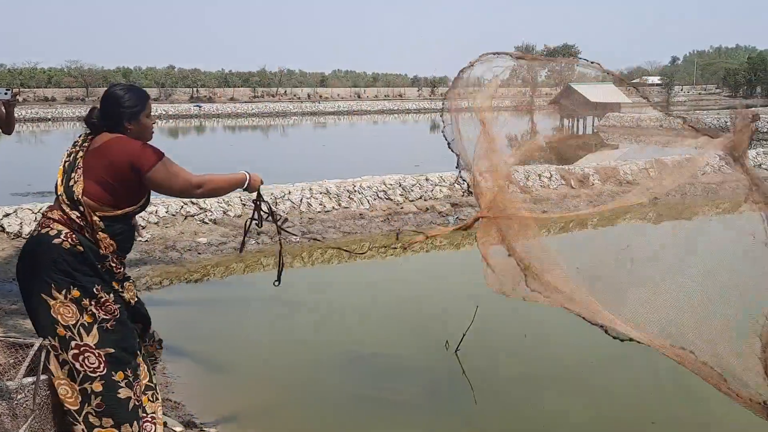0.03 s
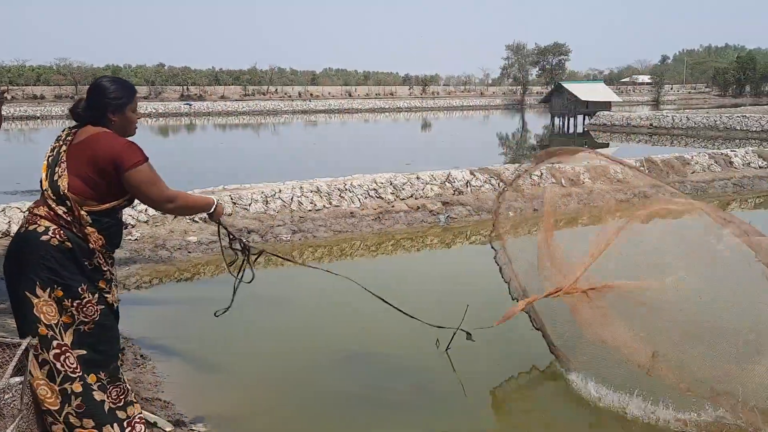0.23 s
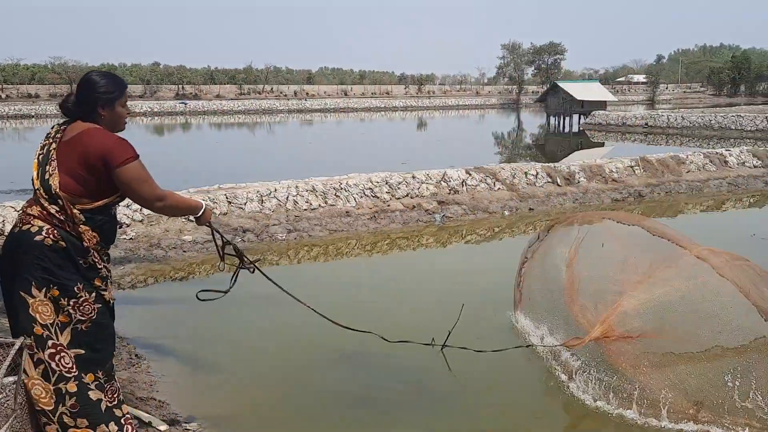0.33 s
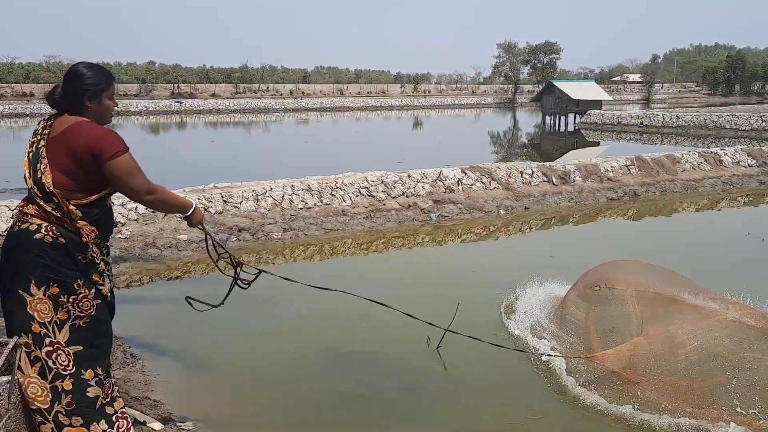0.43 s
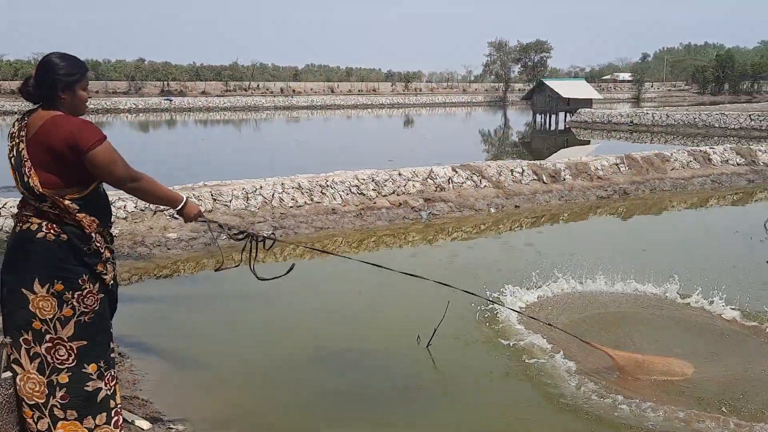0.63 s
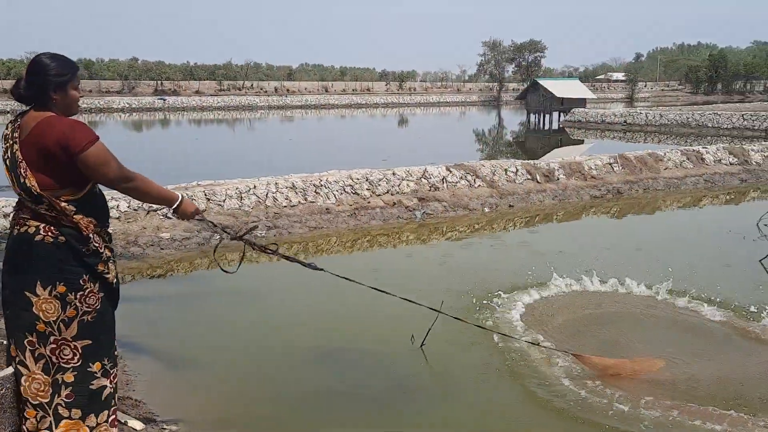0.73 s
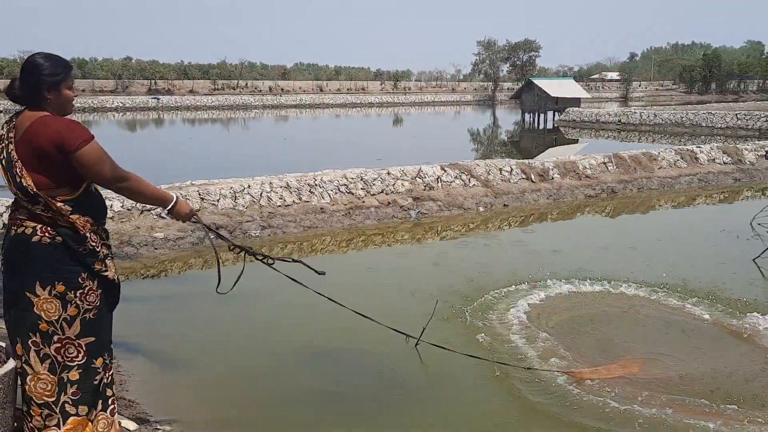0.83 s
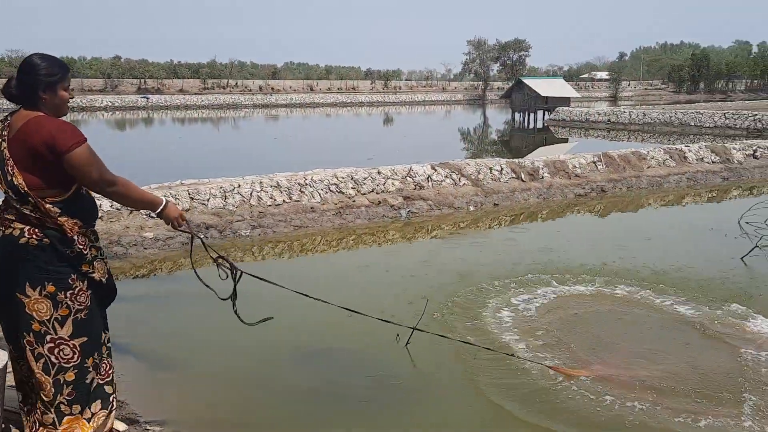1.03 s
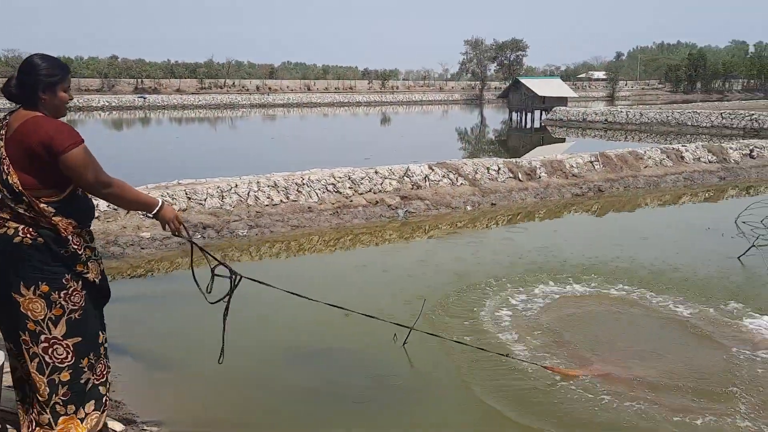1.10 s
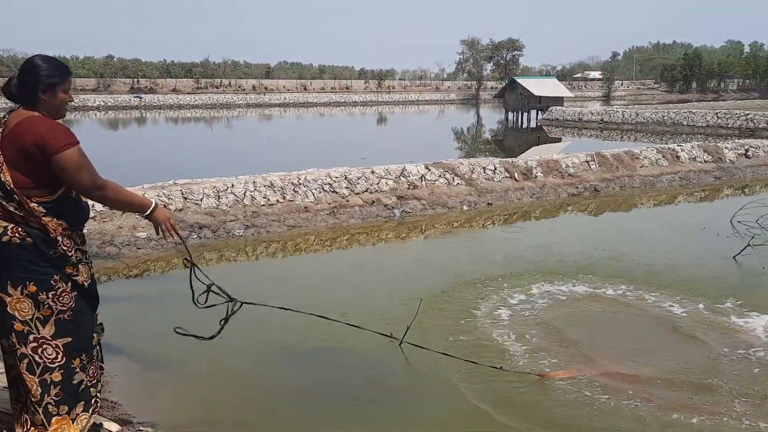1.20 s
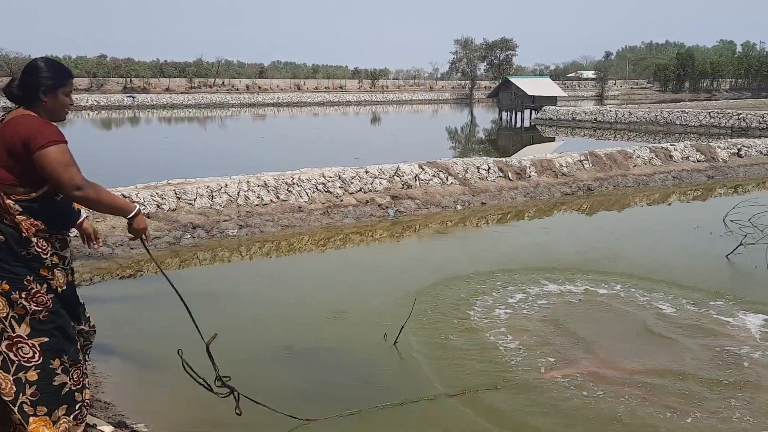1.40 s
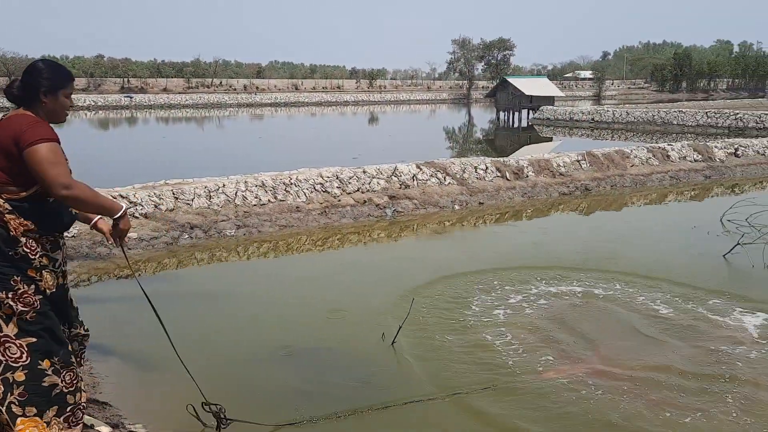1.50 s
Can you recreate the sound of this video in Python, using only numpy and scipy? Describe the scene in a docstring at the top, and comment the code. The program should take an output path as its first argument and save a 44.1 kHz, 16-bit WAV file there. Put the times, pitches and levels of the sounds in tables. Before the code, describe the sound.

A net splashes into a pond outdoors, heard close in stereo without echo. From 0 to 0.23 s, a thin hiss drops away under faint flutter, bangle jingles and dry clicks. At 0.24 s spray bursts out; heavy slaps at 0.31, 0.42 and 0.58 s mix with sharp drops and gulping bubbles. Foam thins to gurgles by 1.2 s; faint hiss remains, and the line rustles softly near 1.47 s.

```python
"""A thin, bright hiss soon drops away while a net flutters open, bangles jingle and the net's weights click.
Its weighted rim then tears into a pond: spray, heavy slaps and bubbles that churn, gulp and thin out.
A faint background hiss lies under the end, where the hand line rustles as it is let go.
Coloured noise makes the hiss, slaps, drops, rustle and faint rumble; sines that die away make the single
bubbles and bangles; crowds of short gliding sines make the flutter and, over noise, the spray and foam."""
import sys
import numpy as np
from scipy.fft import rfft, irfft, next_fast_len
from scipy.io import wavfile

SR = 44100
rng = np.random.default_rng(int(sys.argv[2]) if len(sys.argv) > 2 else 0)


def materialize(psi):
    """Save the field psi as 16-bit PCM at rate SR to the path in sys.argv[1].

    A 1-D psi becomes a single channel; in a 2-D psi each row is a channel.
    """
    bounded = np.clip(np.atleast_2d(psi).T, -1, 1)
    quanta = np.round(bounded * 32767).astype(np.int16)
    wavfile.write(sys.argv[1], SR, quanta)


N = 68355  # length in samples

# In every table, fade_s is the time to fade by 60 dB, and side_db is left minus right.
# How loud each part of the splash is over time: start_s, level_db
# Fine spray and foam, then the finest spray, thrown only while the rim cuts the surface
SPRAY_LEVEL = [(.232, -68), (.243, -36.5), (.256, -32), (.285, -38), (.33, -33.5), (.46, -31.5),
               (.523, -30.5), (.56, -39), (.66, -41.5), (.775, -42.5), (.805, -40), (.87, -45), (1.0, -52),
               (1.15, -60), (1.4, -76)]
MIST_LEVEL = [(.233, -55.5), (.244, -30.5), (.26, -32.5), (.28, -43.5), (.335, -36.5), (.47, -43),
              (.517, -27.5), (.54, -49.5), (.6, -90.5)]
# Small bubbles churning under the rim, then big ones from the air that the net drags under
CHURN_LEVEL = [(.237, -63), (.257, -40), (.305, -34), (.325, -33), (.365, -34), (.43, -28.5), (.47, -31.5),
               (.535, -27), (.62, -36.5), (.7, -38.5), (.88, -41), (1.04, -49.5), (1.14, -54.5),
               (1.23, -65), (1.33, -82.5)]
GULP_LEVEL = [(.245, -83), (.3, -40), (.325, -39.5), (.362, -39), (.43, -30.5), (.5, -32.5), (.575, -32),
              (.615, -47), (.75, -48), (.87, -44.5), (.97, -51), (1.06, -57.5), (1.2, -84.5)]
# Water shoved aside by the sinking rim
SURGE_LEVEL = [(.3, -76), (.385, -53), (.42, -40), (.49, -56.5), (.56, -48.5), (.62, -61), (.82, -57),
               (.97, -85)]
# Heavy slaps of the rim: start_s, level_db, fade_s, side_db
SLAPS = [(.311, -23.5, 0.12, 7), (0.423, -25.5, 0.11, 1), (0.576, -24.5, 0.078, 2.5),
         (0.79, -30.5, 0.025, -3)]
# Single loud bubbles: start_s, pitch_hz, level_db, side_db
BUBBLES = [(.310, 554, -18.5, -5), (.311, 923, -17.5, -1), (.313, 1333, -26, -2), (.424, 951, -20, 5),
           (0.432, 524, -16.5, -0.5), (.470, 437, -20, 2), (.490, 567, -19.5, -6),
           (.574, 1880, -20.5, -11.5), (.578, 754, -19.5, 9), (.648, 492, -33.5, -1),
           (.670, 333, -36.5, 4.5), (0.727, 1225, -25.5, 12), (0.787, 1626, -28, -6),
           (.810, 872, -33.5, 16), (.856, 506, -27, 0), (0.874, 541, -34, -1), (0.889, 2095, -30, -1),
           (.932, 493, -37.5, 3), (1.008, 554, -37.5, -1), (1.044, 1680, -28.5, -2),
           (1.054, 501, -44.5, -16), (1.125, 2510, -44.5, -4), (1.194, 1660, -48, -10),
           (1.239, 1884, -43, -9.5), (1.252, 2670, -45, 2)]
# Sharp cracks of near drops: start_s, level_db
DROPS = [(0.338, -29), (.377, -23), (0.486, -28), (0.511, -18), (0.605, -28), (0.688, -39), (.790, -28.5),
         (.811, -34.5), (.922, -33.5)]
# Bangle contacts: start_s, level_db, pitch_hz that rings hardest
JINGLES = [(.059, -52.5, 9200), (0.071, -51, 15000), (0.081, -47, 12200), (.113, -52, 12310),
           (.170, -54, 9570), (0.185, -51.5, 10700), (.203, -48, 8333)]
# The modes (natural tones) of the bangles: pitch_hz, gain_db
BANGLE_MODES = [(9400, 3.5), (10920, 6), (11400, 0), (13880, 5)]
# Flutter of the net's folds as they open: start_s, level_db
MESH_LEVEL = [(0, -61.5), (.045, -57.5), (.1, -66), (.24, -84)]
# Dry clicks of the net's weights in flight: start_s, level_db
CLICKS = [(.155, -39.5), (0.22, -48.5)]
# The hand line slips through the fingers: start_s, level_db, fade_s
RUSTLES = [(1.466, -38.5, 0.031), (1.476, -44, 0.053)]
# Thin, bright background hiss at the start, which soon drops away: start_s, level_db
OPENING_HISS_LEVEL = [(0, -57), (.05, -56.5), (.08, -58), (.105, -76), (.2, -77)]
# Low rumble near the microphone: start_s, level_db
RUMBLE_LEVEL = [(0, -76.5), (.085, -63), (.175, -65), (.215, -72), (.6, -69.5), (1.37, -73), (1.46, -66.5),
                (1.55, -75.5)]

# Colours, the balance of low and high pitches in each sound: pitch_hz, gain_db
SPRAY_COLOUR = [(1500, -18.5), (3000, -0.5), (3700, 2.5), (6200, 5), (7800, -0.5), (9200, -8), (11000, -4),
                (13500, -4), (16000, -21.5)]
MIST_COLOUR = [(4000, -18.5), (7500, -1), (10000, -7.5), (13500, -2.5), (16000, -4.5)]
CHURN_COLOUR = [(550, -18), (900, 0), (1300, -0.5), (1900, -0.5), (2500, -0.5), (3100, -6), (4500, -14.5)]
TRICKLE_COLOUR = [(750, -8), (1150, 0), (2400, 1), (3400, -10)]
GULP_COLOUR = [(60, -41.5), (210, -47), (320, -9), (480, -4), (600, -1.5), (700, -7), (850, -3.5),
               (1300, -15.5)]
SURGE_COLOUR = [(30, -34.5), (100, -14), (200, -1.5), (290, 8), (500, -21)]
SLAP_COLOUR = [(150, -49), (280, -29.5), (470, -4.5), (950, -6.5), (1400, -11.5), (2400, -13), (9000, -42)]
MESH_COLOUR = [(600, 5.5), (950, 2), (1600, 3), (2600, -8)]
RUSTLE_COLOUR = [(1200, -27.5), (2600, -14.5), (5500, 7), (9000, -3), (12500, -1), (16000, -7)]
OPENING_HISS_COLOUR = [(1000, -22.5), (2300, -2.5), (3400, -5.5), (6000, -0.5), (9000, -13.5), (12000, -3),
                       (16000, -13)]
BACKGROUND_COLOUR = [(500, -32), (1400, -23.5), (2400, -3.5), (3400, -8.5), (5600, 0.5), (9000, -6.5),
                     (12500, -3.5), (16000, -8.5)]
RUMBLE_COLOUR = [(20, -20), (80, 5), (350, -3.5), (600, -18.5), (12000, -28)]
# How alike left and right are: pitch_hz, likeness (0 to 1, no unit)
LIKENESS = [(60, 0.69), (250, 0.87), (520, 0.97), (1000, 0)]
# How much louder the left port is than the right: pitch_hz, side_db
PORTS = [(60, 2.5), (250, 1), (480, -2), (760, 5.5), (1200, 0.5), (1800, 1), (3200, 2.5), (5800, 1),
         (9000, 3.5), (10300, 9), (12500, 13.5), (16000, 2.5)]

THIN_START_S, THIN_S = 0.56, 0.55  # when the churn starts to thin, and how long that takes
SLAP_ATTACK_S, DROP_FADE_S, CLICK_FADE_S = 0.002, 0.013, 0.02
BUBBLE_ATTACK_S = 0.0021
BUBBLE_FADE_S, BUBBLE_FADE_OCT = 0.053, -0.26  # fade at 1 kHz; octaves of fade time per octave of pitch
BANGLE_FADE_S, OFF_PITCH_DB_PER_OCT = 0.038, 32  # modes far from the hardest pitch are softer
BACKGROUND_START_S, BACKGROUND_DB, BACKGROUND_FADE_DB_PER_S = 0.7, -55, 2.5
TOP_HZ, LEFT_LEAD_S = 15900, 0.0003683  # highest pitch kept; sound reaches the left port first


def amp(db):
    """Turn decibels into a multiplier."""
    return 10 ** (np.asarray(db) / 20)


def unit(x):
    """Scale to an average strength (rms) of 1."""
    return x / np.sqrt(np.mean(x ** 2) + 1e-20)


def along(points, hz):
    """Read a value between (pitch, value) points on a log pitch axis."""
    f, v = np.transpose(points)
    return np.interp(np.log(hz + 1), np.log(f + 1), v)


def clock():
    """Time of every sample in seconds."""
    return np.arange(N) / SR


def level(rows):
    """Loudness curve through (time, dB) points, silent before the first."""
    s, db = np.transpose(rows)
    return amp(np.interp(clock(), s, db)) * (clock() >= s[0])


def strike(s, fade_s, attack_s):
    """An envelope that rises at time s and dies away."""
    t = np.maximum(clock() - s, 0)
    return (1 - np.exp(-t / attack_s)) * np.exp(-np.log(1000) * t / fade_s)


def pan(side_db):
    """Left and right gains that differ by side_db."""
    return amp([[side_db / 2], [-side_db / 2]])


def filtered(x, response):
    """Reshape x by a response that depends on pitch."""
    m = next_fast_len(N + SR // 2)  # spare room so the end does not wrap onto the start
    return irfft(rfft(x, m) * response(np.fft.rfftfreq(m, 1 / SR)), m)[..., :N]


def half_turn(hz):
    """Angle that sets how far left and right differ at a pitch."""
    return np.arccos(np.clip(along(LIKENESS, hz), -1, 1)) / 2


def spread(pair, colour):
    """Two unrelated signals become a coloured stereo sound of rms 1, alike only in the bass."""
    def response(hz):
        return amp(along(colour, hz)) * [np.cos(half_turn(hz)), np.sin(half_turn(hz))]
    mid, side = filtered(pair, response)
    return unit(np.array([mid + side, mid - side]))


def hiss(colour):
    """Coloured stereo noise."""
    return spread(rng.standard_normal((2, N)), colour)


def swarm(per_s, lo_hz, hi_hz, cycles, scatter_db, rise, size):
    """Random grains: fading sines that glide up, each reaching the two ports in its own phase."""
    u = rng.random((int(per_s * N / SR), 6))
    start = (u[:, :1] * N).astype(int)
    hz = lo_hz + (hi_hz - lo_hz) * u[:, 1:2]
    t = np.arange(size) / SR
    age = t * hz / (cycles * (0.5 + u[:, 2:3]))  # 1 once faded by 60 dB
    boost_db = scatter_db * np.minimum(-np.log(1 - u[:, 3:4]), np.pi)  # a few are much louder
    strength = amp(boost_db) * np.sqrt(hz)
    body = strength * np.exp(-np.log(1000) * age) * (1 - np.exp(-2 * hz * t))
    phase = 2 * np.pi * hz * t * (1 + rise * np.minimum(age, 1) / 2)
    where = (start + np.arange(size)).ravel()
    ports = []
    for offset in u.T[-2:]:
        grains = body * np.sin(phase + 2 * np.pi * offset[:, None])
        ports.append(np.bincount(where, grains.ravel(), N)[:N])
    return unit(np.array(ports))


def foam(grains, colour, wash_db):
    """Grains over a wash of noise."""
    wash = amp(wash_db) * rng.standard_normal((2, N))
    return spread(grains + wash, colour)


def crackle():
    """A crowd of very short, high grains."""
    return swarm(3500, 2000, 16000, cycles=8, scatter_db=4, rise=0.05, size=200)


def patter():
    """A dense crowd of short grains in the midrange."""
    return swarm(3000, 750, 3400, cycles=24, scatter_db=2.5, rise=0.06, size=1000)


def splash():
    """The rim enters the water: mist, crackling spray, churning small bubbles, gulping big ones, a low surge."""
    spray = foam(crackle(), SPRAY_COLOUR, wash_db=2)
    mist = foam(crackle(), MIST_COLOUR, wash_db=0)
    big_bubbles = swarm(400, 260, 950, cycles=34, scatter_db=2, rise=0.06, size=4400)
    gulp = foam(big_bubbles, GULP_COLOUR, wash_db=-7)
    surge = level(SURGE_LEVEL) * hiss(SURGE_COLOUR)
    return level(SPRAY_LEVEL) * spray + level(MIST_LEVEL) * mist + churn() + level(GULP_LEVEL) * gulp + surge


def churn():
    """A dense seethe of small bubbles thins into a trickle of separate gurgles."""
    seethe = foam(patter(), CHURN_COLOUR, wash_db=3.5)
    gurgles = swarm(650, 950, 3100, cycles=42, scatter_db=2.5, rise=0.1, size=2000)
    trickle = foam(gurgles, TRICKLE_COLOUR, wash_db=1)
    thin = np.clip((clock() - THIN_START_S) / THIN_S, 0, 1)
    return level(CHURN_LEVEL) * (np.sqrt(1 - thin) * seethe + np.sqrt(thin) * trickle)


def slaps():
    """Stretches of the rim land all at once, each a burst of noise that fades."""
    out = np.zeros((2, N))
    for s, db, fade_s, side_db in SLAPS:
        out += amp(db) * pan(side_db) * strike(s, fade_s, SLAP_ATTACK_S) * hiss(SLAP_COLOUR)
    return out


def bubbles():
    """Single air pockets ring and glide upward as they near the surface; the higher ones die sooner."""
    out = np.zeros((2, N))
    for s, hz, db, side_db in BUBBLES:
        t = np.maximum(clock() - s, 0)
        fade_s = BUBBLE_FADE_S * (hz / 1000) ** BUBBLE_FADE_OCT
        rise_per_s = rng.uniform(0, 3)  # share of its pitch gained each second, its own for each bubble
        phase = 2 * np.pi * hz * t * (1 + rise_per_s * t / 2)
        skew = half_turn(hz) * rng.choice([-1, 1])  # the ports hear it out of step
        tone = np.sin(phase + [[skew], [-skew]])
        out += amp(db) * unit(pan(side_db)) * strike(s, fade_s, BUBBLE_ATTACK_S) * tone
    return out


def near_drops():
    """A few drops strike hard enough to stand out of the spray: very short bursts of noise."""
    cracks = sum(amp(db) * strike(s, DROP_FADE_S, attack_s=0.0002) for s, db in DROPS)
    return cracks * hiss(SPRAY_COLOUR)


def bangles():
    """Each contact briefly rings the bangles, most of all the modes near one pitch; the wrist damps them."""
    out = np.zeros((2, N))
    for s, db, main_hz in JINGLES:
        for hz, mode_db in BANGLE_MODES:
            rung_hz = hz * (1 + rng.normal(0, 0.009))  # slightly off each time
            ring = np.sin(2 * np.pi * (rung_hz * clock() + rng.random((2, 1))))
            ring_db = db + mode_db - OFF_PITCH_DB_PER_OCT * abs(np.log2(hz / main_hz))
            out += amp(ring_db) * strike(s, BANGLE_FADE_S, attack_s=0.00055) * ring
        # a soft tick of noise comes with each contact
        out += amp(db - 13) * strike(s, fade_s=0.04, attack_s=0.0004) * hiss(MIST_COLOUR)
    return out


def throw():
    """The net's folds flutter open, its weights click, and the hand line rustles when let go."""
    folds = level(MESH_LEVEL) * spread(patter(), MESH_COLOUR)
    clicks = sum(amp(db) * strike(s, CLICK_FADE_S, attack_s=0.0006) for s, db in CLICKS)
    line = sum(amp(db) * strike(s, fade_s, attack_s=0.00092) for s, db, fade_s in RUSTLES)
    return folds + clicks * hiss(MIST_COLOUR) + line * hiss(RUSTLE_COLOUR)


def opening_hiss():
    """Thin, bright background noise at the start, which soon drops away."""
    return level(OPENING_HISS_LEVEL) * hiss(OPENING_HISS_COLOUR)


def background_hiss():
    """A faint, almost steady background hiss lies under the end: noise with fine grains in it."""
    age = clock() - BACKGROUND_START_S
    loudness = amp(BACKGROUND_DB - BACKGROUND_FADE_DB_PER_S * age) * (age > 0)
    return loudness * foam(crackle(), BACKGROUND_COLOUR, wash_db=7)


def rumble():
    """Low noise near the microphone that swells and sinks."""
    return level(RUMBLE_LEVEL) * hiss(RUMBLE_COLOUR)


def scene():
    """Add all the sources in open air, with no walls to answer."""
    water = splash() + slaps() + bubbles() + near_drops()
    background = opening_hiss() + background_hiss() + rumble()
    return water + bangles() + throw() + background


def record(dry):
    """The left port is earlier and brighter than the right; nothing is kept above TOP_HZ."""
    half = np.array([[0.5], [-0.5]])  # each port takes half of the difference

    def response(hz):
        balance = amp(along(PORTS, hz) * half)
        lead = np.exp(2j * np.pi * hz * LEFT_LEAD_S * half)
        return balance * lead * (hz < TOP_HZ)
    return filtered(dry, response)


dry = scene()
out = record(dry)
materialize(out)
```